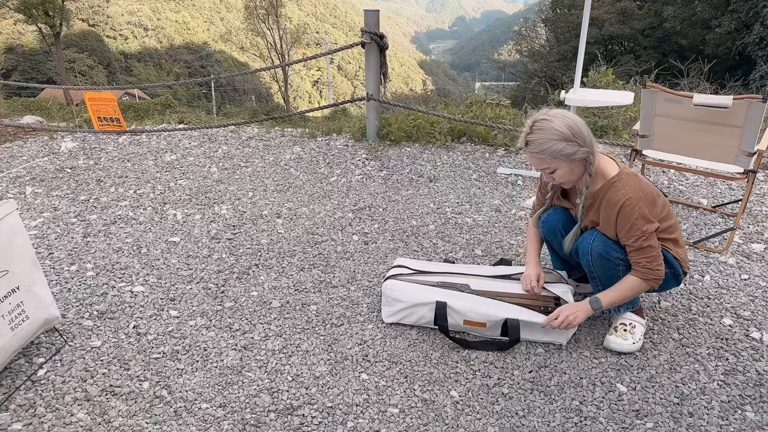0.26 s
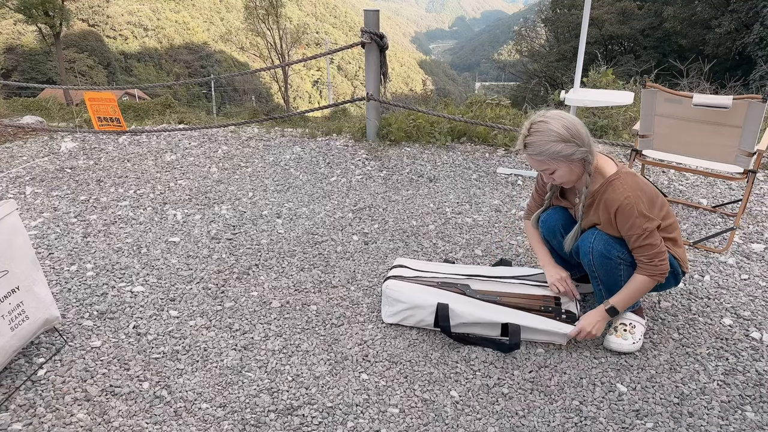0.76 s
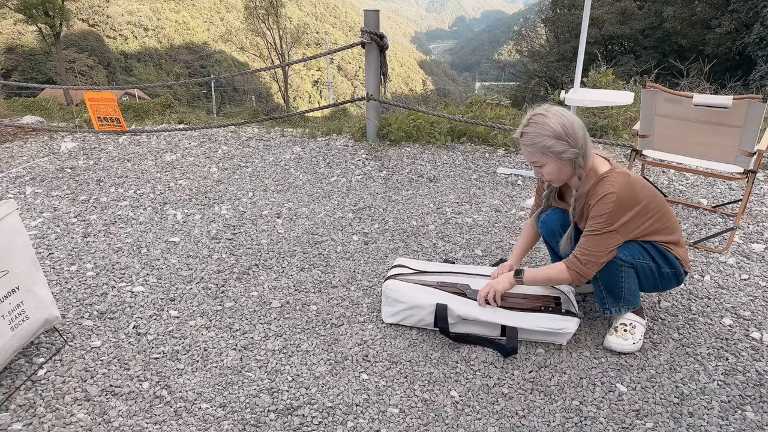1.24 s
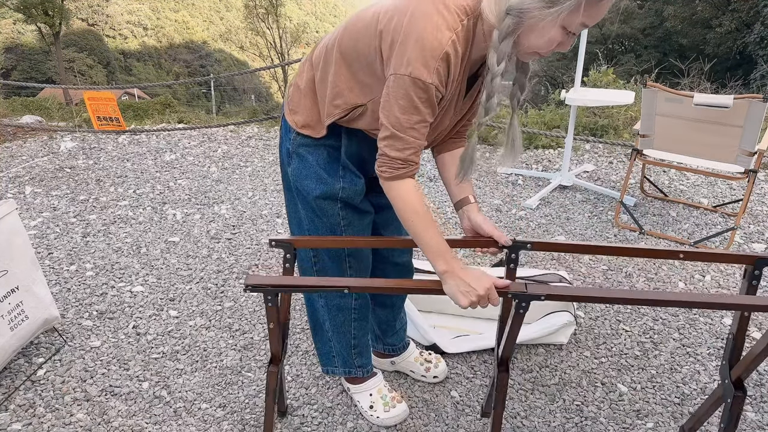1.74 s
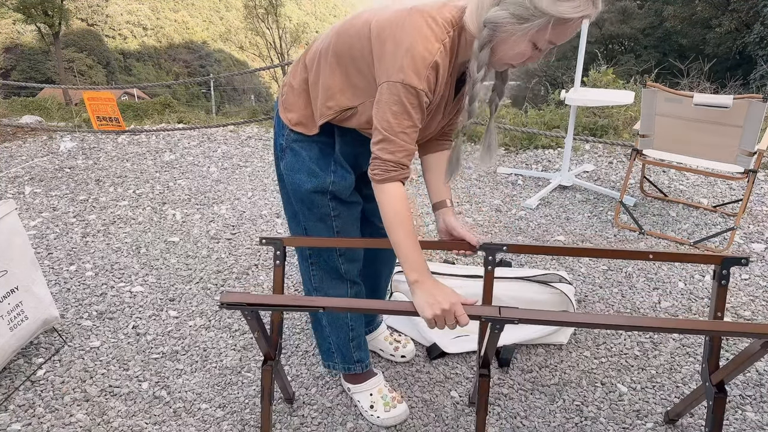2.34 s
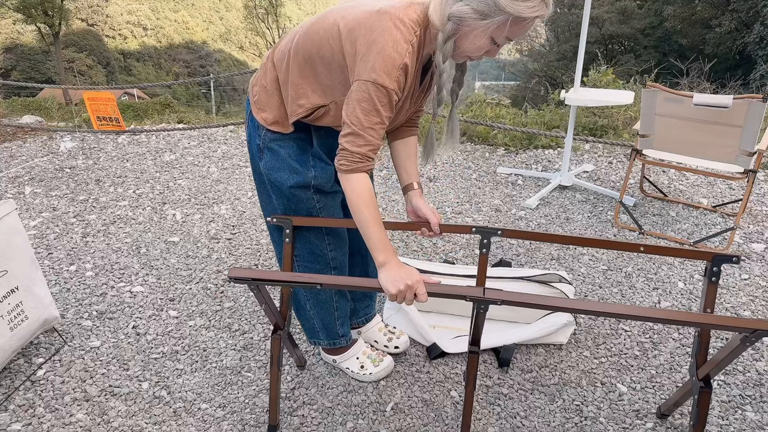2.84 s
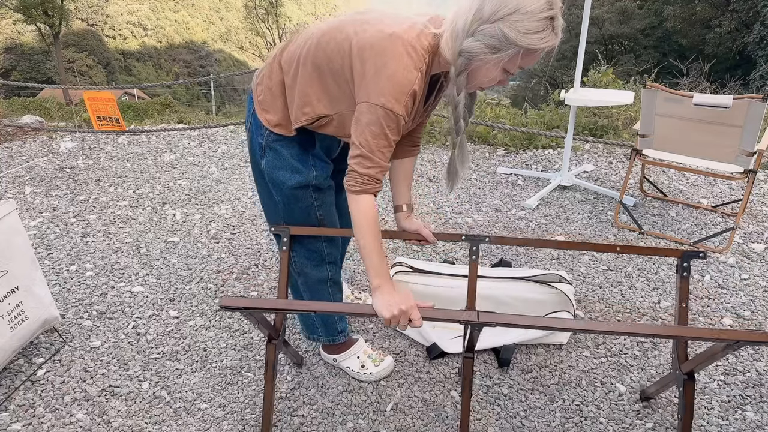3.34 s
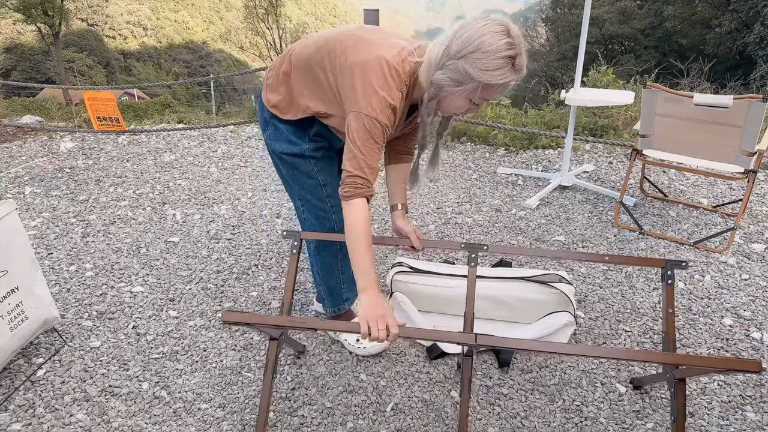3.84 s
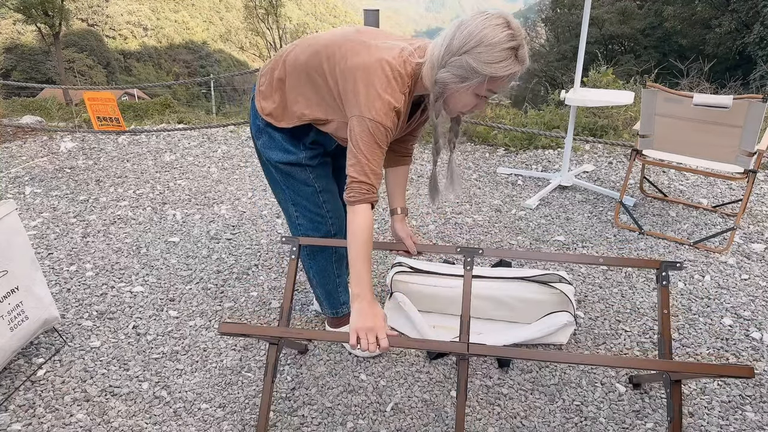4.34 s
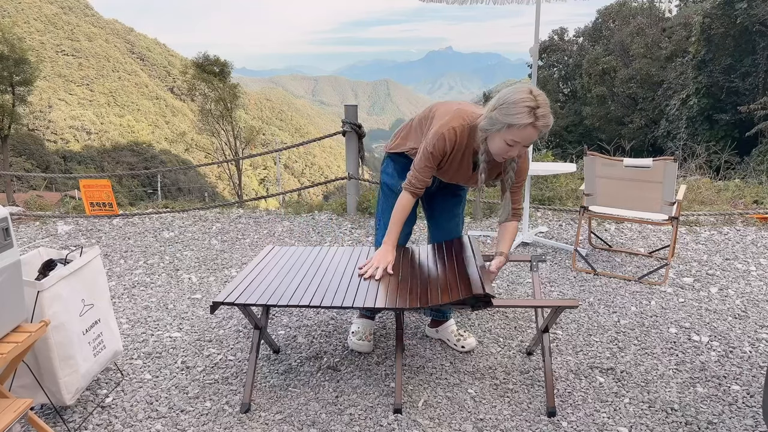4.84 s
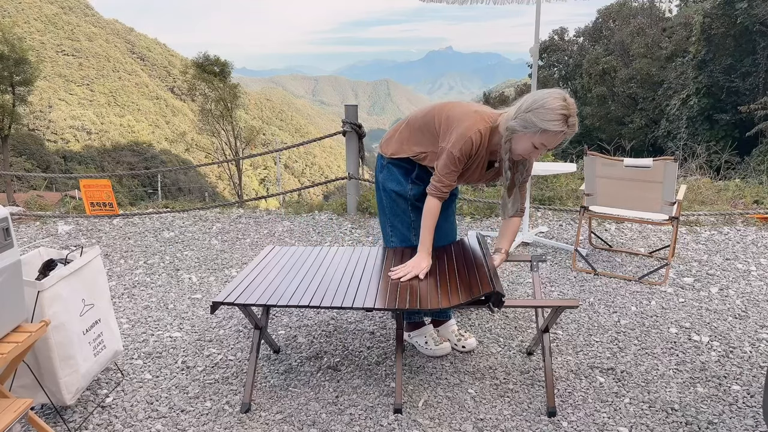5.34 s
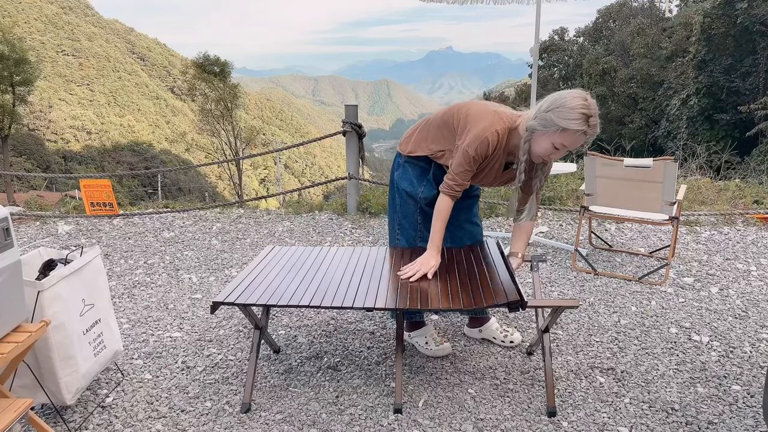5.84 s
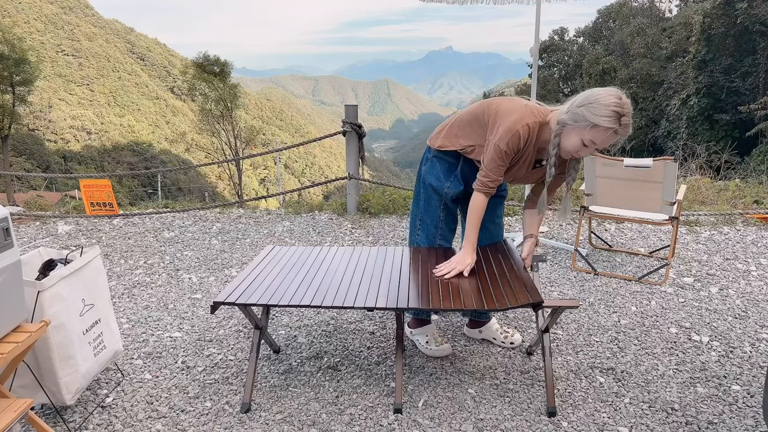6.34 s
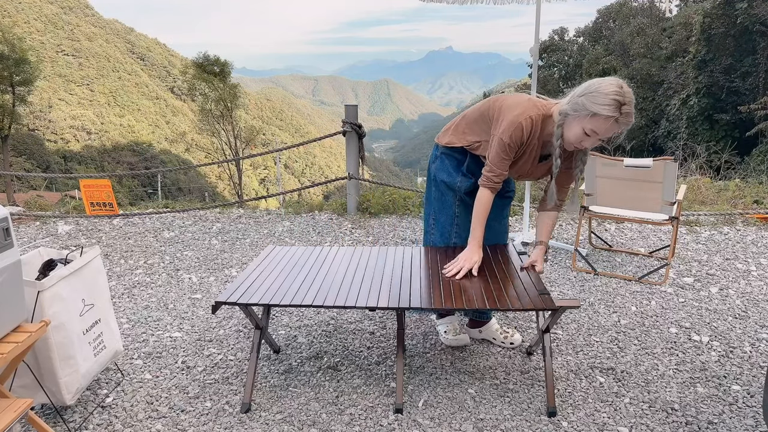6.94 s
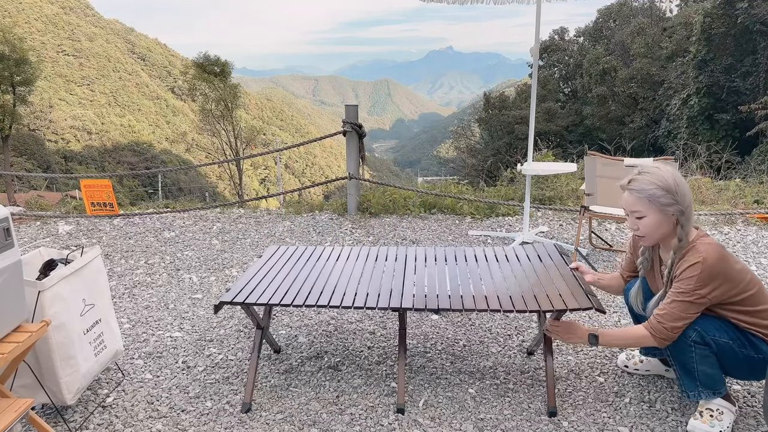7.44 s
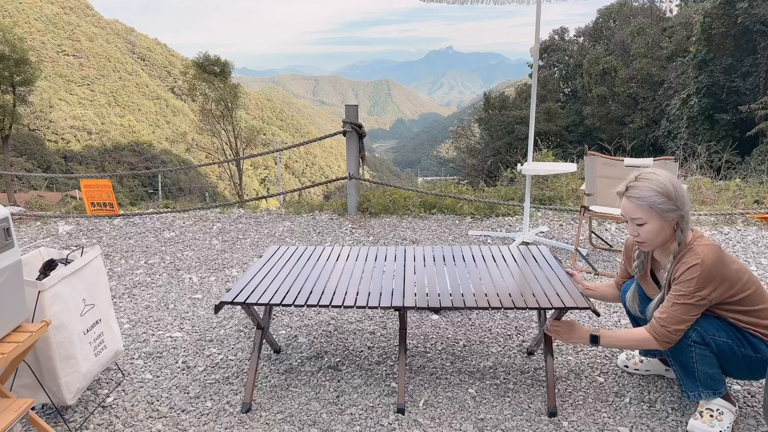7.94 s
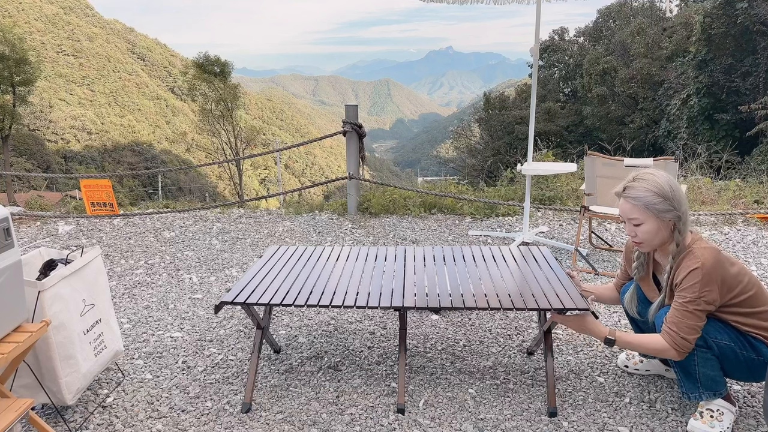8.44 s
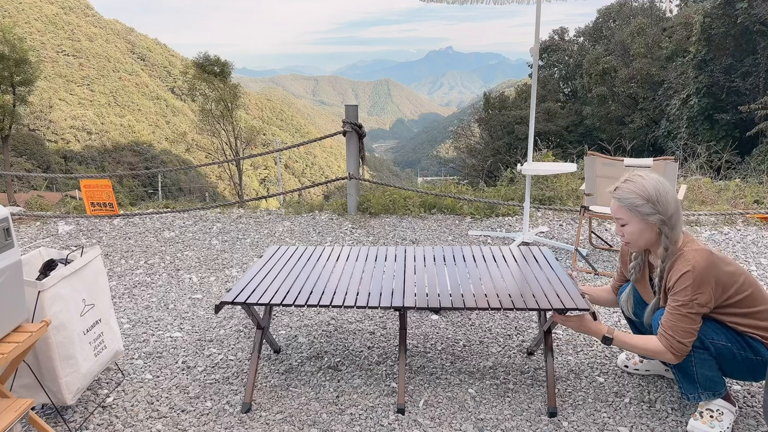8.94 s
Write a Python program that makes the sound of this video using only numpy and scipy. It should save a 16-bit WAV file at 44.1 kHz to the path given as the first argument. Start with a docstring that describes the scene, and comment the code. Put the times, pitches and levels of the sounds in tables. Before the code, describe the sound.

Dry outdoor sound on a gravel terrace, with still air, low rumble, thin high insect song and a far engine. From 0 to 1.4 s a full canvas bag shifts quietly: hollow rumble, small creases, soft hand pats. At about 1.5 s the engine throb grows and a wooden frame is pulled open in irregular tugs until 4.3 s, joints juddering and rasping, early knocks around 1.7 s, legs crunching through stones, with stronger drags near 3.5 and 4 s. At 4.5 s the engine all but disappears, higher insects emerge, and slats rattle along rails. Loud sharp clacks land at 5.0, 5.7, 6.3 and 6.6 s, some with bright clicks, between lighter scuffs. From 7 to 7.9 s come rubbing and a dense run of duller knocks; a loose slat bounces quickly at 8.15 s, then soft thumps at 8.4, 8.7 and 9 s.

```python
"""Wooden slats clack on each other as a folding table is set up on a gravel terrace: noisy contacts ring modes.
First a canvas bag rustles (filtered noise and grains); then the frame is pulled open, its joints slipping
through resonances and its legs dragging through stones (dense grains); the slatted top is unrolled along
its rails and pressed home with thumps, clicks and lingering tones. Behind: still air, low rumble,
insect choirs (resonant noise) in the hills and a far engine (sine orders) that throbs for the first half."""
import sys
import numpy as np
from scipy import signal
from scipy.fft import rfft, irfft, next_fast_len
from scipy.io import wavfile

SR = 44100
rng = np.random.default_rng(int(sys.argv[2]) if len(sys.argv) > 2 else 0)


def store_wav(level_fs):
    """Save 16-bit WAV to argv[1]."""
    pcm = np.round(np.clip(np.atleast_2d(level_fs), -1, 1) * 32767)
    wavfile.write(sys.argv[1], SR, pcm.T.astype(np.int16))


N = 404838
TIME = np.arange(N) / SR

# slat modes: (frequency [Hz], relative level [dB], t60 before damping [s])
SLAT_MODES = [(126, -18.5, 0.29), (215, -19.5, 0.23), (367.5, -4.5, 0.17), (480, -6.5, 0.079),
              (778, -3.5, 0.061), (883, -1.5, 0.028), (1099, 0.5, 0.042), (1201.5, -2.5, 0.1),
              (1686, -4.5, 0.043), (1828, 6, 0.037), (1780, -28, 0.089), (2338, 0, 0.079),
              (2497, 2.5, 0.057), (2610, -4.5, .06), (2980, -2, 0.022), (3198, -3.5, 0.082),
              (3530, -29.5, 0.045), (3880, -6, 0.045), (4100, -10.5, 0.074), (4640, -6.5, 0.036),
              (5430, -15.5, 0.044), (5530, -15, 0.041), (6600, -26.5, 0.032)]
# spectrum of slat contact: (frequency [Hz], relative density [dB per Hz])
CONTACT_SPECTRUM = [(25, -26), (60, -14), (150, -13), (380, 5.5), (600, -1.5), (1100, -4), (1450, 0.5),
                    (1900, 3), (3200, 0), (4500, -8), (5900, -9.5), (8000, -20), (13000, -30),
                    (16000, -45.5)]


def amp(db):
    """Decibels to gain."""
    return 10 ** (np.asarray(db) / 20)


def unit(x):
    """Scales to rms 1."""
    return x / np.sqrt(np.mean(x ** 2) + 1e-20)


def add(mix, s, sound):
    """Mixes a sound in at time s."""
    part = mix[max(round(s * SR), 0):][:len(sound)]
    part += sound[:len(part)]


def level(curve):
    """Gain along a (time [s], level [dB]) curve, -120 dB outside it."""
    s, db = np.transpose(curve)
    return amp(np.interp(TIME, s, db, left=-120, right=-120))


def colour(x, points):
    """Filters by (frequency [Hz], gain [dB]) points, interpolated over log frequency."""
    points_hz, db = np.transpose(points)
    size = next_fast_len(len(x))
    hz = np.fft.rfftfreq(size, 1 / SR)
    gain = amp(np.interp(np.log(hz + 1), np.log(points_hz), db))
    return irfft(rfft(x, size) * gain, size)[:len(x)]


def wander(rate_hz, size=N):
    """Straight lines between Gaussian values drawn rate_hz times a second."""
    at = np.arange(size) * rate_hz / SR
    knots = int(at[-1]) + 2
    return np.interp(at, np.arange(knots), rng.standard_normal(knots))


def resonate(x, hz, width_hz):
    """A resonance of peak gain 1."""
    return signal.lfilter(*signal.iirpeak(hz, hz / width_hz, fs=SR), x)


def ring(modes, detune=0., damping=1, uneven_db=0.):
    """Decaying sines of a struck part; each call draws new mode pitches, signs and strengths."""
    t = np.arange(SR // 4) / SR
    hz, db, t60_s = np.transpose(modes)[:, :, None]
    shift, strength, side = rng.standard_normal((3, len(modes), 1))
    decay = amp(db + uneven_db * strength - 60 * t * damping / t60_s)
    tones = np.sin(2 * np.pi * hz * (1 + detune * shift) * t)
    return (np.sign(side) * decay * tones).sum(0)


def grains(per_s, spread_db):
    """Tiny random collisions of rms 1 overall; their sizes spread exponentially in dB."""
    size = amp(spread_db * np.minimum(rng.exponential(1, N), 4))
    return unit(size * rng.standard_normal(N) * (rng.random(N) < per_s / SR))


def burst(size, rise_s, fall_s):
    """A short swell of noise."""
    t = np.arange(size) / SR
    return rng.standard_normal(size) * (1 - np.exp(-t / rise_s)) * np.exp(-t / fall_s)


def swell(s, hold_s, rise_s, fall_s):
    """Envelope of one movement: builds up to time s, holds, dies away; 20 dB per rise or fall time."""
    at = TIME[::32]
    away = np.maximum(s - at, 0) / rise_s + np.maximum(at - s - hold_s, 0) / fall_s
    return np.interp(TIME, at, amp(-20 * away))


def strokes(rows, rise_s, fall_s):
    """Gain of a series of like movements, summed in power."""
    return np.sqrt(sum((amp(db) * swell(s, hold_s, rise_s, fall_s)) ** 2 for s, hold_s, db in rows))


def air(level_db=-60.0):
    """Still air: steady coloured noise."""
    # (frequency [Hz], relative density [dB per Hz])
    air_spectrum = [(30, 9), (400, -3), (800, -0.5), (2000, -4), (3000, -6), (5000, -8), (7000, -10),
                    (9000, -12), (11000, -17), (13500, -21.5), (16000, -39.5)]
    return amp(level_db) * unit(colour(rng.standard_normal(N), air_spectrum))


def rumble(gain_db=0.5):
    """Low air rumble, easing off: coloured noise under a level curve."""
    # (time [s], level before gain [dB])
    rumble_curve = [(0, -55.5), (3.5, -54.5), (5.6, -57.5), (7.0, -59.5), (9.18, -61)]
    # (frequency [Hz], relative density [dB per Hz])
    rumble_spectrum = [(20, -4), (45, -18), (70, -1.5), (110, 3), (170, -1.5), (260, -6), (400, -6.5),
                       (800, -23), (2000, -50)]
    return amp(gain_db) * level(rumble_curve) * unit(colour(rng.standard_normal(N), rumble_spectrum))


def insects():
    """Choirs as noise through two resonances, some pulsing; levels shift between 4.4 and 4.7 s."""
    # (frequency [Hz], width [Hz], level at first [dB], level later [dB], pulse rate [1/s], depth [0-1])
    choirs = [(3780, 420, -68.5, -70, 18, 0), (5720, 120, -71.5, -70.5, 28, .5),
              (7870, 970, -94, -68.5, 7, .05)]
    out = np.zeros(N)
    for hz, width_hz, first_db, later_db, pulse_hz, depth in choirs:
        stage_hz = 1.5 * width_hz  # two stages narrow the band again
        song = unit(resonate(resonate(rng.standard_normal(N), hz, stage_hz), hz, stage_hz))
        pulse_turns = np.cumsum(pulse_hz * (1 + 0.033 * wander(1.5))) / SR
        pulse = 1 + depth * np.sin(2 * np.pi * pulse_turns)
        out += song * pulse * amp(np.interp(TIME, [4.4, 4.7], [first_db, later_db]))
    return out


def engine(firing_hz=18.3):
    """Far engine: multiples of an unsteady firing rate, each wavering in level."""
    # (time [s], level [dB])
    engine_curve = [(0, -56), (1.4, -56), (1.7, -49.5), (4.5, -49), (4.62, -73), (9.18, -68)]
    # (multiple of firing rate, relative level [dB])
    orders = [(2, -12.5), (3, 1.5), (4, 1), (5, -2.5), (6, -17.5)]
    turns = np.cumsum(firing_hz * (1 + 0.014 * wander(3.3))) / SR
    exhaust = np.zeros(N)
    for multiple, db in orders:
        phase = 2 * np.pi * (round(multiple) * turns + rng.random())
        exhaust += amp(db + 1.9 * wander(7.7)) * np.sin(phase)
    return level(engine_curve) * unit(exhaust)


def bag(drone_db=2.0, crease_db=-14.0, pat_fall_s=0.016):
    """Full bag shifting on the ground: hollow rumble, ticks of stiff canvas, soft pats of hands."""
    # (time [s], level before drone and crease gains [dB])
    bag_curve = [(0, -57), (.35, -63), (.5, -51), (.8, -52), (1.1, -53), (1.35, -56), (1.5, -71)]
    # hands bump the canvas: (time [s], level before decay [dB])
    pats = [(.172, -52.5), (.51, -59), (0.729, -50.5), (.795, -51), (1.074, -50), (1.184, -49),
            (1.321, -48), (1.358, -51)]
    canvas = [(150, 0), (400, -5), (850, 0), (1600, -9), (4000, -24)]
    hollow = [(40, -8), (80, 5.5), (125, 2.5), (175, 3), (230, -13.0), (500, -39.0)]
    drone = unit(colour(rng.standard_normal(N), hollow))
    creases = unit(colour(grains(per_s=50, spread_db=-1.0), canvas))
    out = level(bag_curve) * (amp(drone_db) * drone + amp(crease_db) * creases)
    t = np.arange(SR // 10) / SR
    for s, db in pats:
        pat = unit(colour(rng.standard_normal(len(t)), canvas))
        add(out, s, amp(db) * pat * np.exp(-t / pat_fall_s))
    return out


def tugs():
    """Tugs spread the frame and drag its legs; one envelope each drives joints, stones and grinding."""
    # (time [s], hold [s], rise [s], fall [s], joints [dB], loose stones [dB], grinding [dB]), before gains
    pulls = [(1.585, 0.019, 0.087, 0.071, -30.5, -57, -45.5), (1.653, .12, 0.027, .15, -32.5, -40.5, -55.5),
             (1.875, 0.045, 0.037, 0.33, -38, -48.5, -56), (2.051, 0.015, 0.039, 0.036, -36, -46, -58),
             (2.113, 0.15, .015, 0.2, -42.5, -53, -51), (2.318, 0.062, .1, 0.092, -45, -47, -53),
             (2.658, 0.011, 0.12, 0.065, -39.5, -52, -48.5), (2.751, .035, 0.1, 0.08, -41, -43, -59),
             (2.847, 0.031, 0.013, 0.046, -36.5, -46, -51), (2.942, 0.014, 0.026, 0.1, -38, -48, -49),
             (3.052, 0.016, 0.089, 0.033, -44.5, -55, -54), (3.154, .03, 0.065, .1, -52, -78, -46),
             (3.227, 0.086, 0.071, .2, -41, -53.5, -55), (3.474, 0.096, 0.33, 0.16, -33, -37.5, -52),
             (3.942, 0.056, 0.099, 0.12, -33.5, -38.5, -42), (4.121, 0.017, 0.026, .08, -39, -51, -54),
             (4.202, 0.011, 0.052, 0.046, -38.5, -48.5, -46.5)]
    power = 0
    for s, hold_s, rise_s, fall_s, *db in pulls:
        power = power + (amp(db)[:, None] * swell(s, hold_s, rise_s, fall_s)) ** 2
    return np.sqrt(power)


def gravel(dragging, grinding, drag_db=4.0, scuff_db=5.0, clump_db=2.0):
    """Dense grains crunch under legs, shoes and creasing canvas; sparser, duller grains grind."""
    # (frequency [Hz], relative density [dB per Hz])
    stone_spectrum = [(150, -12), (400, -4), (900, 2), (1600, -1), (2800, -2.5), (4200, 0), (6000, -2),
                      (8000, -3.5), (10500, -3.5), (13000, -9), (15500, -25.5)]
    # (frequency [Hz], relative density [dB per Hz])
    grind_spectrum = [(120, -20), (240, -2.5), (400, -4), (600, -7.5), (880, -4), (1400, -2.5), (2100, -23),
                      (4000, -38)]
    # canvas and shoe scuffs: (time [s], hold [s], level before gain [dB])
    scuffs = [(.06, 0.063, -58), (.72, 0.19, -66.5), (1.2, 0.079, -64.5), (1.32, 0.057, -57.5),
              (1.48, 0.0067, -47.5), (4.31, 0.014, -65), (4.51, 0.17, -60), (4.56, 0.016, -48.5),
              (4.71, 0.09, -59), (4.875, 0.0091, -58), (5.065, 0.027, -56.5), (5.325, 0.088, -50),
              (5.62, 0.12, -56.5), (5.845, 0.077, -57.5), (5.99, .08, -60), (6.545, 0.047, -57.5),
              (6.92, 0.07, -60), (7.075, 0.0092, -57.5), (7.4, .08, -67), (7.68, .14, -67),
              (8.05, 0.016, -55)]
    stones = grains(per_s=16000, spread_db=1.2)
    crunch = unit(colour(stones, stone_spectrum)) * amp(clump_db * wander(140))
    grind = unit(colour(grains(per_s=790, spread_db=0.5), grind_spectrum))
    scuffing = strokes(scuffs, rise_s=0.013, fall_s=0.058)
    return crunch * (amp(drag_db) * dragging + amp(scuff_db) * scuffing) + grinding * grind


def frame(sliding, gain_db=-3.5, judder_db=2.5):
    """Joints stick and slip: unsteady grains excite the frame resonances as it spreads."""
    # (frequency [Hz], width [Hz], relative level [dB])
    resonances = [(1255, 88, -7.5), (2250, 140, -0.5), (2580, 360, 0), (2996, 130, -1), (3300, 330, -5),
                  (3800, 310, -19)]
    slips = grains(per_s=5000, spread_db=-0.5) * amp(judder_db * wander(110))
    wood = sum(amp(db) * resonate(slips, hz, width_hz) for hz, width_hz, db in resonances)
    tone = [(300, -5), (1000, 1.0), (1600, 2.5), (2300, 0), (3800, -2.0), (7000, -1.0)]
    return amp(gain_db) * sliding * unit(colour(wood, tone))


def snaps(rise_s=0.0057, fall_s=0.0093):
    """Hard fittings slip home with a bright click of coloured noise."""
    # (time [s], rms over first 20 ms [dB])
    clicks = [(5.702, -30.5), (6.083, -38)]
    # (frequency [Hz], relative density [dB per Hz])
    click_spectrum = [(2500, -14), (4800, -13), (5800, 5.5), (6800, -4), (8500, -10), (12000, -34),
                      (15500, -40)]
    out = np.zeros(N)
    for s, db in clicks:
        click = colour(burst(SR // 10, rise_s, fall_s), click_spectrum)
        add(out, s, amp(db) * click / click[:SR // 50].std())
    return out


def thumps(glide_s=0.0063, end_hz=65, rise_s=0.0041, tick_rise_s=0.0028, tick_fall_s=0.014):
    """Dull thumps: a dry noise tick and a low sine push that sags in pitch as it dies."""
    # (time [s], push [dB], starting pitch [Hz], tick [dB], push decay [s]); levels before envelope and filter
    pushes = [(7.462, -33, 691, -38, 0.0086), (7.77, -36, 669, -39.5, 0.013),
              (8.374, -33.5, 412, -39, 0.0067), (8.475, -53, 487, -52.5, 0.053),
              (8.677, -41, 732, -37, 0.027), (8.972, -32.5, 620, -37, 0.012)]
    tick_spectrum = [(150, 2), (500, 0.5), (1000, -1.0), (2500, -9.5), (5000, -6.0), (9000, -16.0),
                     (12000, -15), (15000, -26)]
    out, t = np.zeros(N), np.arange(SR // 8) / SR
    for s, db, start_hz, tick_db, fall_s in pushes:
        turns = np.cumsum(end_hz + (start_hz - end_hz) * np.exp(-t / glide_s)) / SR
        push = 2 * np.sin(2 * np.pi * turns) * (1 - np.exp(-t / rise_s)) * np.exp(-t / fall_s)
        tick = unit(colour(rng.standard_normal(len(t)), tick_spectrum))
        tick *= (1 - np.exp(-t / tick_rise_s)) * np.exp(-t / tick_fall_s)
        add(out, s, amp(db) * push + amp(tick_db) * tick)
    return colour(out, [(80, 2), (150, -9.5), (235, 6), (380, -2.0), (530, 7), (750, -2.5), (1200, 0)])


def after_rings(rise_s=0.0029):
    """Lingering tones of wood and fittings after a blow: decaying sines."""
    # (time [s], frequency [Hz], level before decay [dB], t60 [s])
    tones = [(1.245, 5560, -34, 0.06), (2.215, 358, -30.5, 0.066), (3.36, 305, -38, 0.094),
             (4.632, 1770, -21, 0.051), (5.427, 365, -41, 0.2), (5.012, 2570, -15, 0.072),
             (6.275, 1148, -28.5, 0.25), (6.275, 128, -36.5, 0.21), (6.597, 134, -34, 0.17),
             (7.405, 1822, -23.5, 0.18), (8.05, 522, -37, 0.065), (8.68, 4730, -47.5, 0.52),
             (8.71, 293, -38.5, 0.15)]
    out, t = np.zeros(N), np.arange(SR // 2) / SR
    for s, hz, db, t60_s in tones:
        envelope = amp(db - 60 * t / t60_s) * (1 - np.exp(-t / rise_s))
        add(out, s, envelope * np.sin(2 * np.pi * hz * t))
    return out


def loose_slat(rise_s=0.0025, graze_fall_s=0.0071, graze_db=6.0):
    """A loose slat bounces to rest; each bounce rings its modes and grazes the rail with noise."""
    # (time [s], level [dB])
    bounces = [(8.124, -49), (8.136, -37), (8.149, -29.5), (8.169, -32.5), (8.184, -32.5), (8.203, -37.5),
               (8.232, -44), (8.29, -52), (8.321, -59)]
    # (frequency [Hz], relative level [dB], t60 [s])
    loose_modes = [(1122, -7.5, 0.12), (1250, -17, 0.067), (1643, 1, 0.075), (1840, -4, 0.042),
                   (2300, -1, 0.045), (2570, -12, .04), (2950, -19, 0.056)]
    graze_spectrum = [(400, -2), (1100, 0.5), (2400, -9), (4000, -15), (9000, -30), (15000, -45)]
    out = np.zeros(N)
    for s, db in bounces:
        slat = ring(loose_modes, detune=0.0024, uneven_db=1.0)
        slat *= 1 - np.exp(-np.arange(len(slat)) / SR / rise_s)
        graze = colour(burst(len(slat), rise_s, graze_fall_s), graze_spectrum)
        add(out, s - .002, amp(db) * (slat + amp(graze_db) * graze))
    return out


def rubbing(gain_db=-1.0, judder_db=1.0, scuff_db=-5.0):
    """Small slips keep three slats ringing as the top is drawn along the rails."""
    # (time [s], hold [s], level before gain [dB])
    draws = [(4.55, 0.18, -52), (4.76, 0.22, -42.5), (5.05, 0.081, -55), (5.38, 0.16, -50),
             (5.66, 0.14, -55), (6.01, 0.048, -46.5), (6.39, 0.48, -59), (6.935, 0.011, -45.5),
             (7.125, 0.075, -37), (7.29, 0.2, -43.5), (7.56, 0.025, -47.5), (7.7, .19, -40),
             (7.94, 0.0038, -53.5)]
    wood = np.zeros(N)
    for _ in range(3):
        slips = grains(per_s=330, spread_db=7.0)
        wood += signal.oaconvolve(slips, ring(SLAT_MODES, detune=0.015, damping=1.1))[:N]
    scuff = unit(colour(rng.standard_normal(N), CONTACT_SPECTRUM))
    tone = [(150, -4.5), (400, -1.5), (1100, 4.0), (2500, -2), (3500, -7.5), (7000, -5)]
    rattle = unit(colour(unit(wood) + amp(scuff_db) * scuff, tone))
    drawing = strokes(draws, rise_s=0.089, fall_s=0.06)
    return amp(gain_db) * drawing * rattle * amp(judder_db * wander(45))


def clack(band_db, rise_s=0.0042, fall_s=0.0065, chatter_db=1.0, light_ring_db=5.5, hard_ring_db=2.0,
          rebound_s=0.015, rebound_db=-14, scatter_db=-20, scatter_fall_s=0.022):
    """Chattering contact noise rings the slats: a light touch mostly rings, a hard one cracks broadly."""
    # edges of thud, body, clack, crack and fizz bands: (frequency [Hz])
    band_edges = [100, 650, 1450, 3000, 6500, 15000]
    t = np.arange(SR // 3) / SR - .03  # landing peaks at 0
    hardness = np.clip((band_db[3] + 50) / 25, 0, 1)  # from crack band
    landing, rebound = (np.exp(np.minimum(u / rise_s, -u / fall_s)) for u in (t, t - rebound_s))
    scatter = (t > 0) * np.exp(-abs(t) / scatter_fall_s)
    force = landing + amp(rebound_db) * rebound + amp(scatter_db) * scatter
    contact = force * amp(chatter_db * wander(891.5, size=len(t))) * rng.standard_normal(len(t))
    modes = ring(SLAT_MODES, detune=0.0037 + 0.022 * hardness, damping=1.85, uneven_db=2.5)
    wood = signal.fftconvolve(contact, modes)[:len(t)]
    ring_db = light_ring_db + hardness * (hard_ring_db - light_ring_db)
    spectrum = rfft(unit(colour(contact, CONTACT_SPECTRUM)) + amp(ring_db) * unit(wood))
    hz, edges = np.fft.rfftfreq(len(t), 1 / SR), np.array(band_edges)
    blow = (t > -.003) & (t < .016)
    # bring each band's level during the blow to band_db, interpolating between band centres
    own_db = []
    for lo, hi in zip(edges, edges[1:]):
        band = irfft(spectrum * (hz > lo) * (hz < hi))
        own_db.append(20 * np.log10(band[blow].std()))
    log_centres = np.log(edges[1:] * edges[:-1]) / 2
    tilt_db = np.interp(np.log(hz + 1), log_centres, np.subtract(band_db, own_db))
    return irfft(spectrum * amp(tilt_db))


def knocks(gain_db=-2.0, lead_s=.029):
    """Blows of wood on wood, frame and slats: weight adds thud, edge adds crack."""
    # (time [s], strength before gain [dB], weight [dB], edge [dB])
    blows = [(0.064, -52.5, 4, 25), (1.247, -60, 14, 21), (1.649, -30, -23, 6), (1.765, -27, -13, 3),
             (2.05, -34, -15, 7), (2.253, -39, 8, -12), (2.752, -33, -28, 7.5), (2.849, -34.5, -5, 6.5),
             (4.512, -47.5, 27, -7), (4.632, -45, 7.5, 18), (4.726, -38, 5.5, 13), (4.789, -26.5, 3.5, -3),
             (4.923, -30.5, -3, -7), (4.987, -23.5, 7, 5.5), (5.001, -12.5, 0.5, -4.5), (5.03, -31.5, 3, 2),
             (5.068, -54, 32, 4), (5.324, -33, 0, 8), (5.426, -53, 33, 12), (5.455, -44, 10.5, 10),
             (5.499, -30, -6.5, -1.5), (5.575, -33, 2, 1.5), (5.635, -48.5, 18, 25), (5.667, -35, 16, 3),
             (5.685, -32.5, 17, 16), (5.707, -14.5, 4, 10), (5.994, -40, -8, 10), (6.089, -22, -9, 5),
             (6.123, -31, 4, -4), (6.181, -50, 21, -5), (6.259, -29, 3, -7), (6.271, -16.5, 4.5, 3.5),
             (6.403, -59, 25, 0), (6.474, -67, 35.5, 3), (6.539, -48, 23.5, 19), (6.59, -10.5, -6, -3),
             (6.606, -28, 2, 12.5), (7.0, -31, 12.5, -8), (7.014, -34.5, 11, -4), (7.157, -29.5, 5.5, -16),
             (7.246, -35.5, 2, -18), (7.286, -41.5, 8, -13), (7.55, -40.5, -4, -10), (7.591, -41.5, 4, -18),
             (7.402, -22.5, -5, -15), (7.419, -28, -2.5, -9), (7.659, -22, -9.5, -14),
             (7.687, -26.5, -6, 0), (7.724, -23.5, -6, -11), (7.76, -35, 9, 1.5), (7.808, -31.5, -2, -17),
             (7.838, -23.5, -3.5, -8), (7.863, -30, 4, -15)]
    # per band, thud to fizz: (plain level [dB], share of weight, share of edge)
    blow_bands = [(-21, 1, 0.27), (-8, 0.66, 0), (-1, 0, 0), (-12.5, 0.027, 1), (-31.5, 0, 0.6)]
    out = np.zeros(N)
    plain_db, by_weight, by_edge = np.transpose(blow_bands)
    for s, db, weight_db, edge_db in blows:
        add(out, s - lead_s, clack(db + plain_db + weight_db * by_weight + edge_db * by_edge))
    return amp(gain_db) * out


def scene():
    """All sources, dry in the open air."""
    sliding, dragging, grinding = tugs()
    background = air() + rumble() + insects() + engine()
    setting_up = bag() + gravel(dragging, grinding) + frame(sliding)
    fittings = snaps() + thumps() + after_rings()
    slats = loose_slat() + rubbing() + knocks()
    return (background + setting_up + fittings + slats)[None]


def record(dry):
    """Soft saturation of the loudest blows (tanh, ceiling 1), then a linear-phase low-pass."""
    low_pass = signal.firwin(511, 15750, window=("kaiser", 9), fs=SR)  # cutoff in Hz
    return signal.oaconvolve(np.tanh(dry), low_pass[None], "same")


dry = scene()
out = record(dry)
store_wav(out)
```